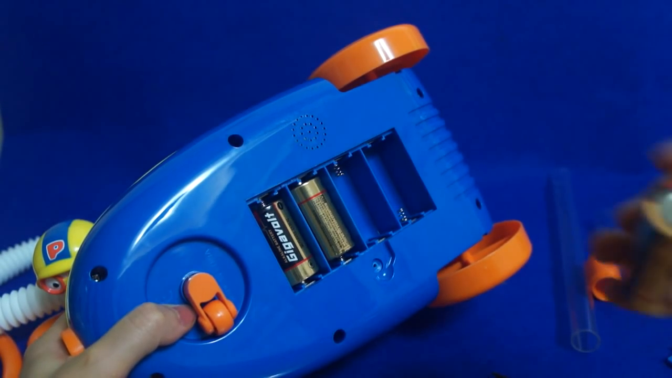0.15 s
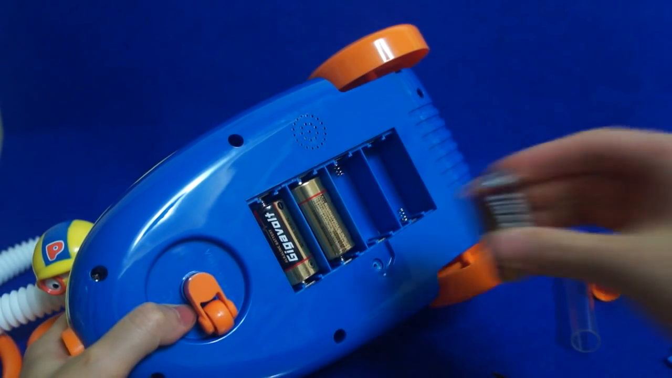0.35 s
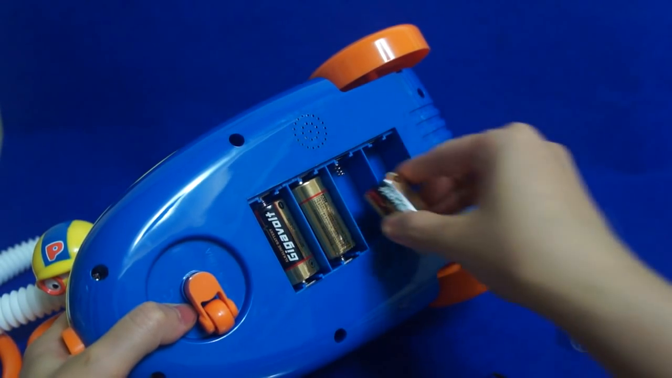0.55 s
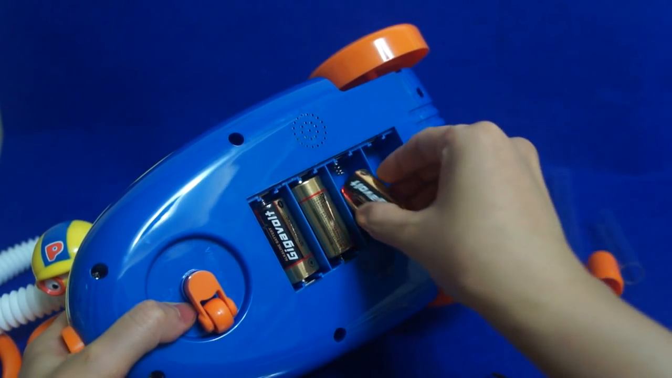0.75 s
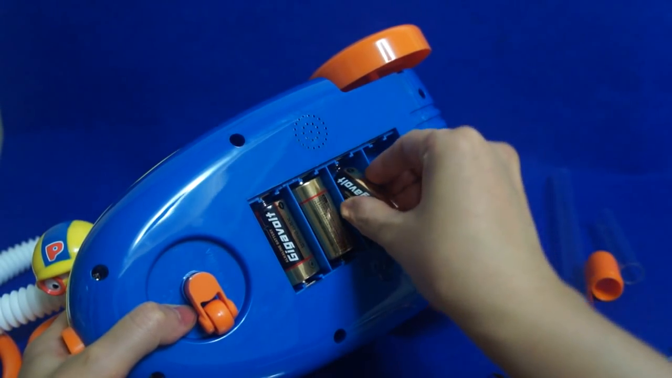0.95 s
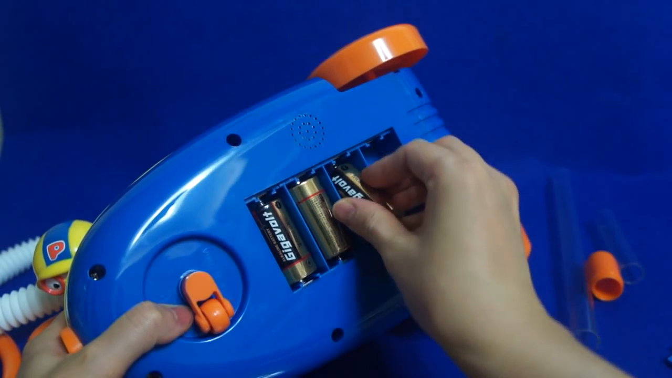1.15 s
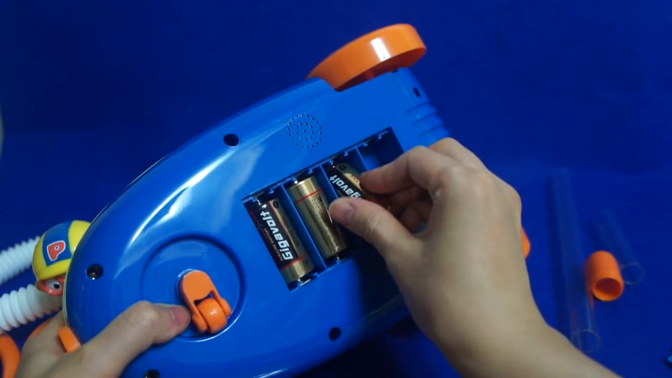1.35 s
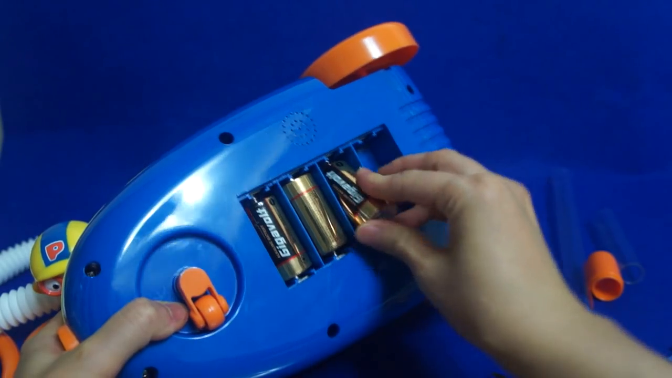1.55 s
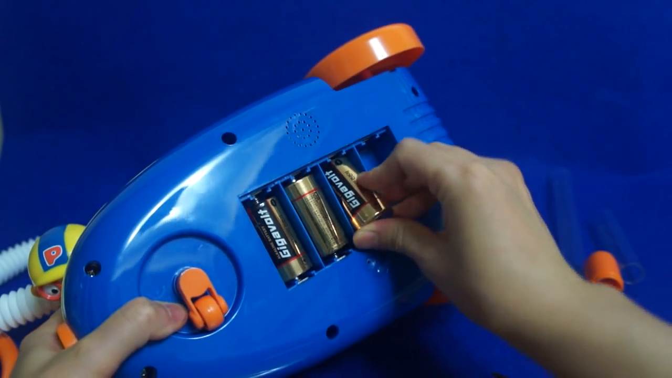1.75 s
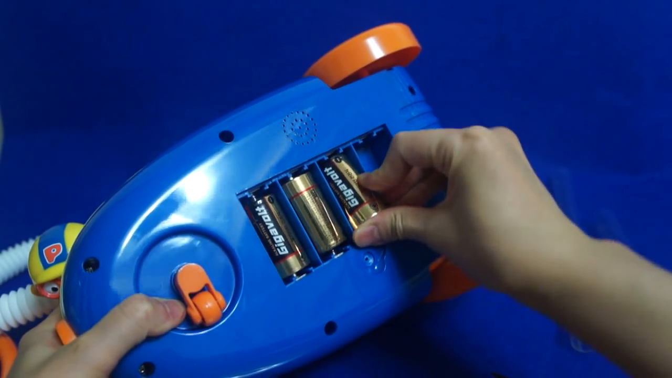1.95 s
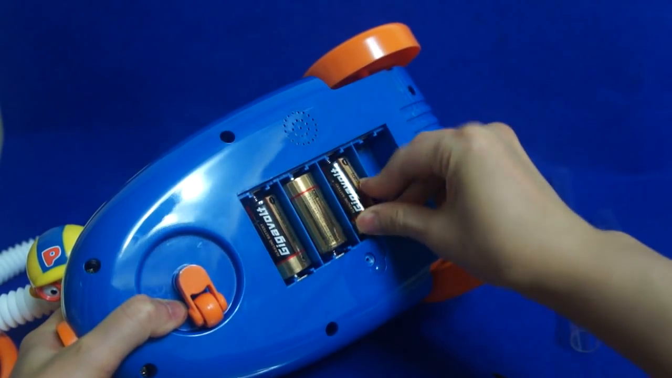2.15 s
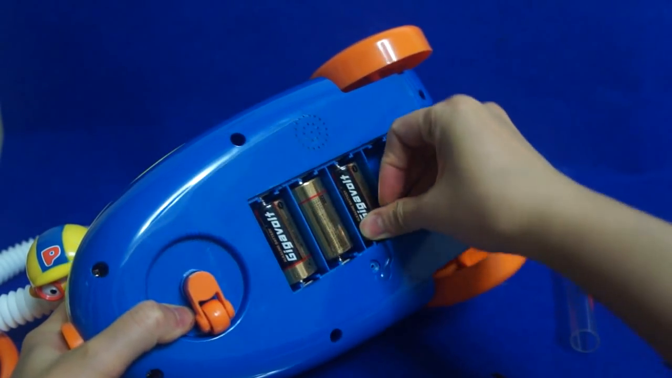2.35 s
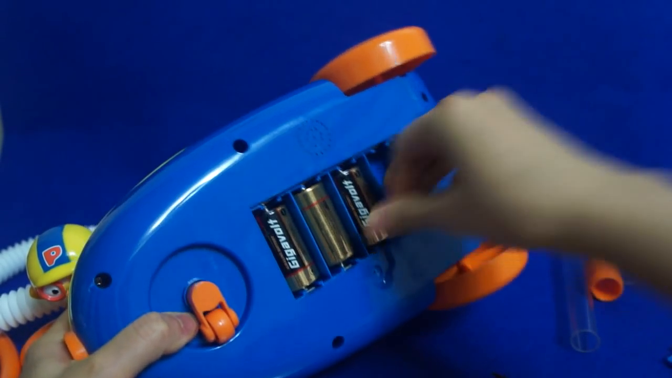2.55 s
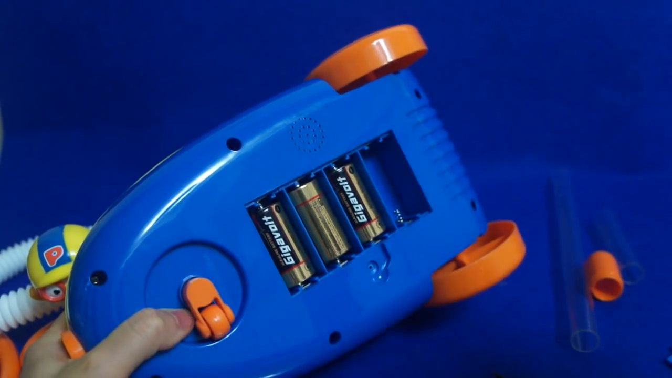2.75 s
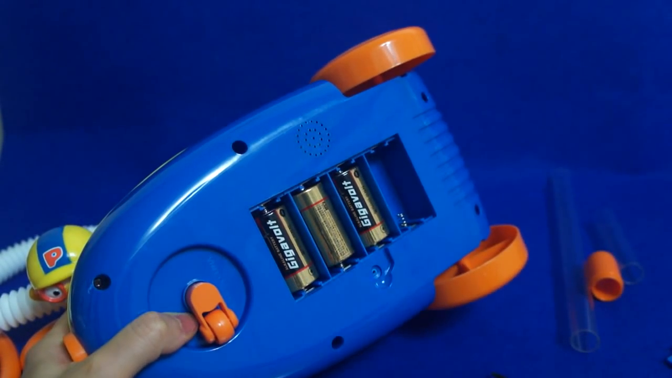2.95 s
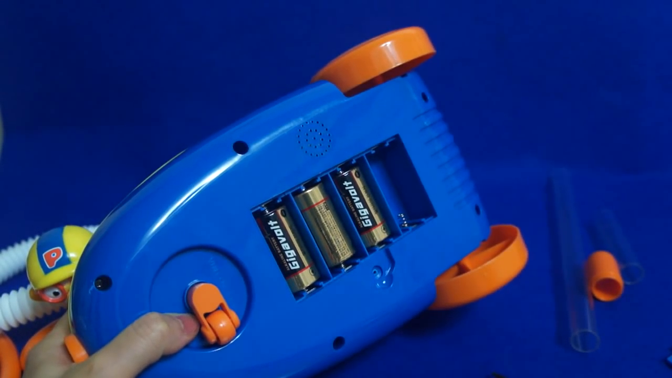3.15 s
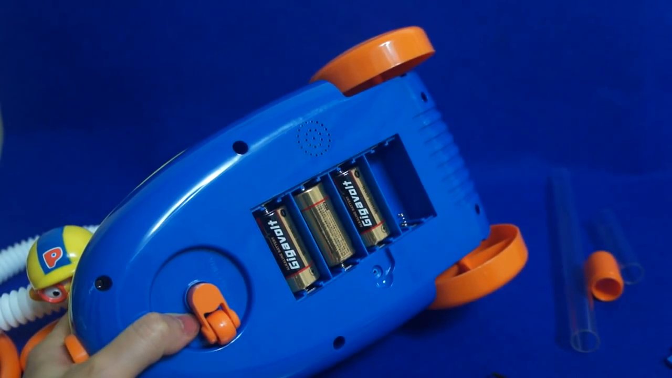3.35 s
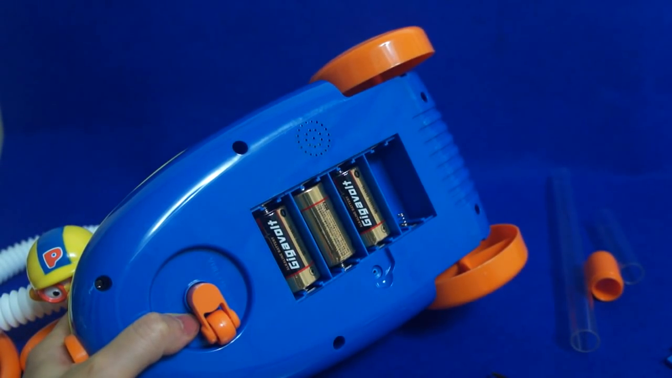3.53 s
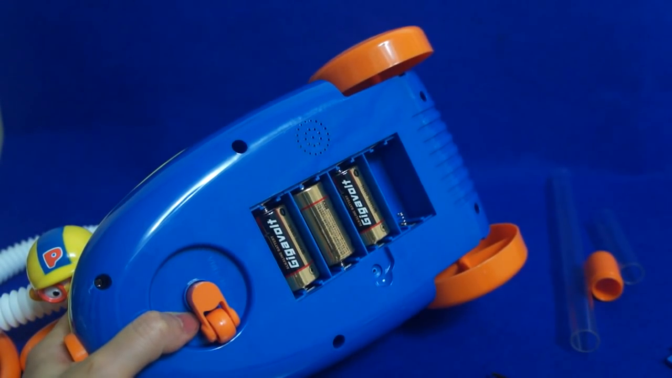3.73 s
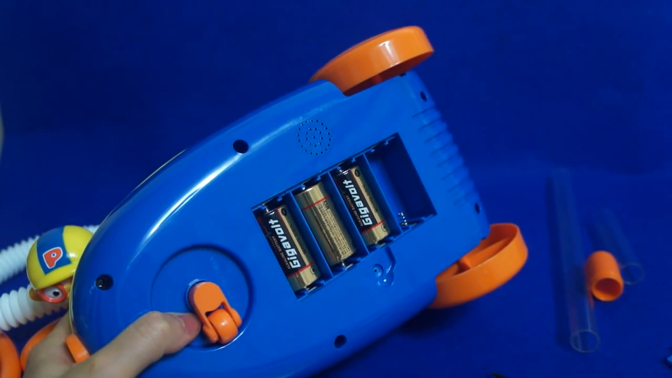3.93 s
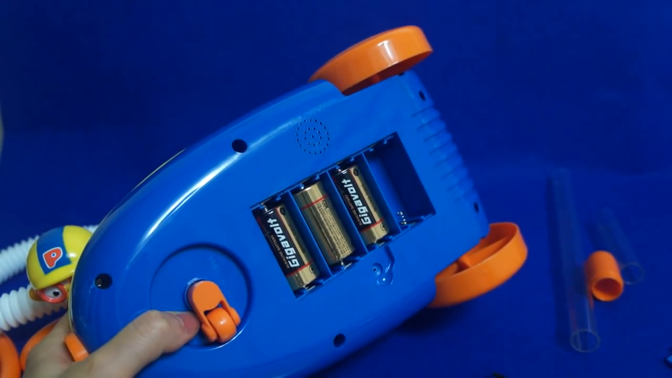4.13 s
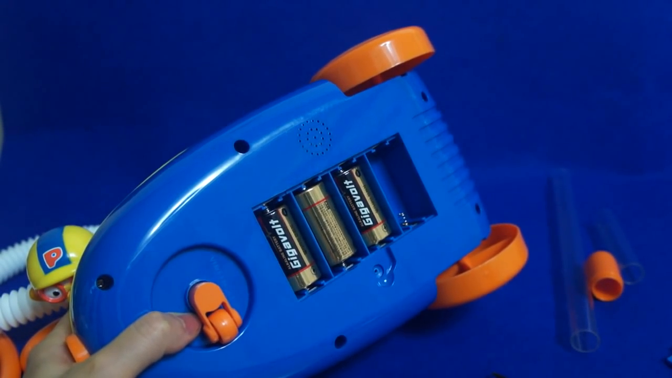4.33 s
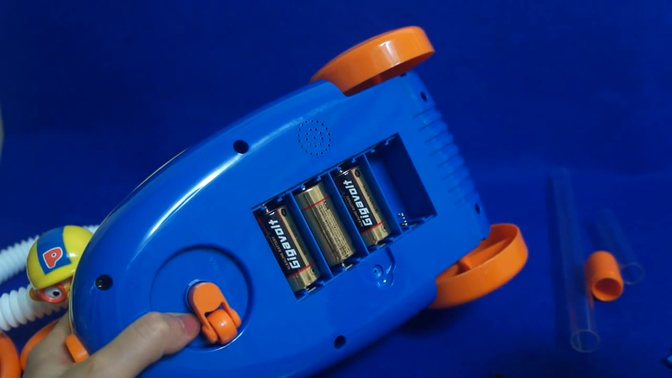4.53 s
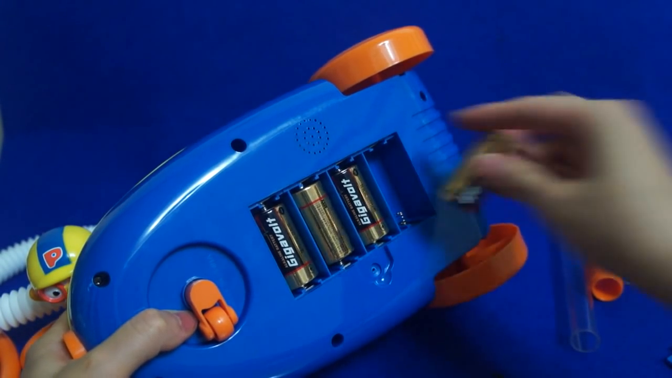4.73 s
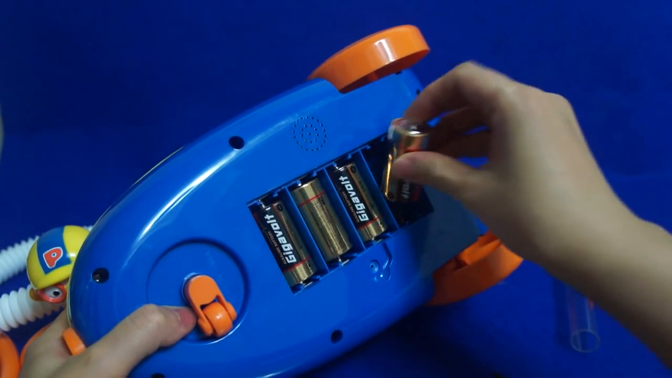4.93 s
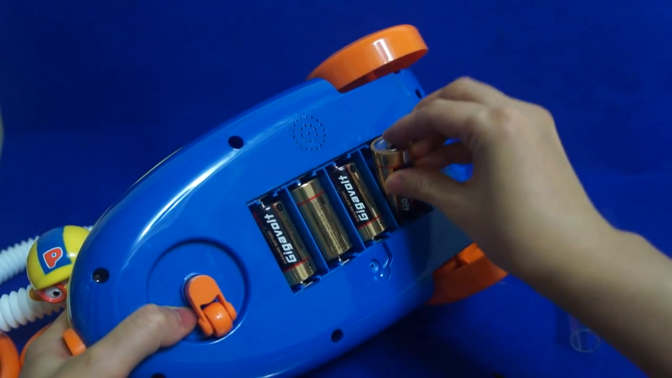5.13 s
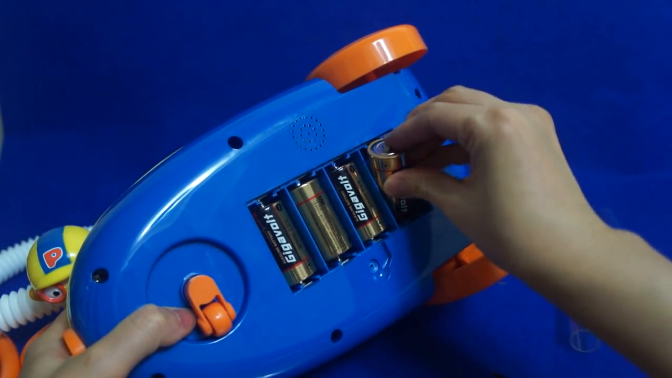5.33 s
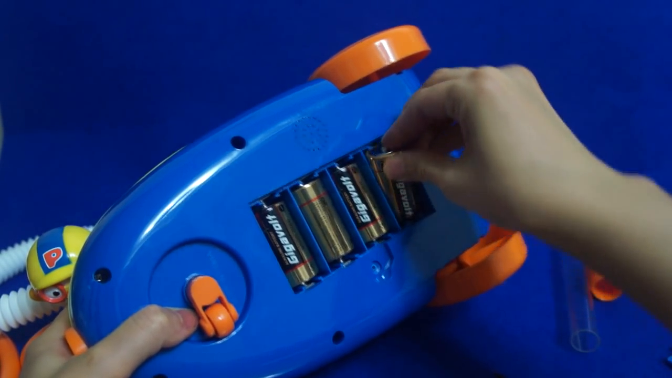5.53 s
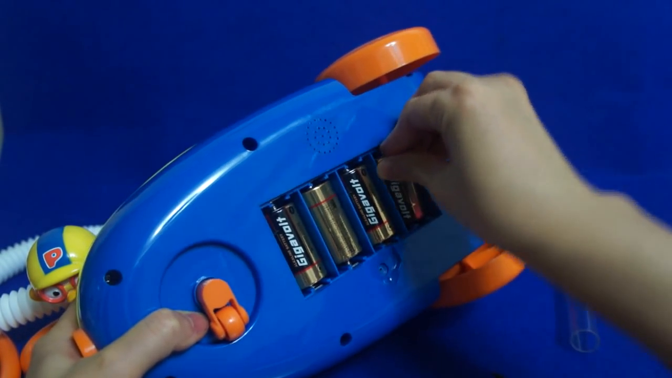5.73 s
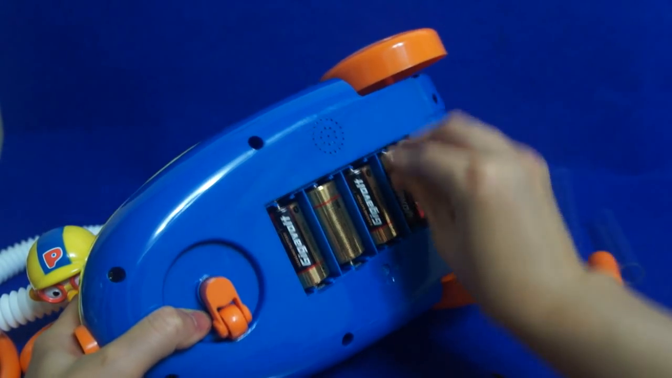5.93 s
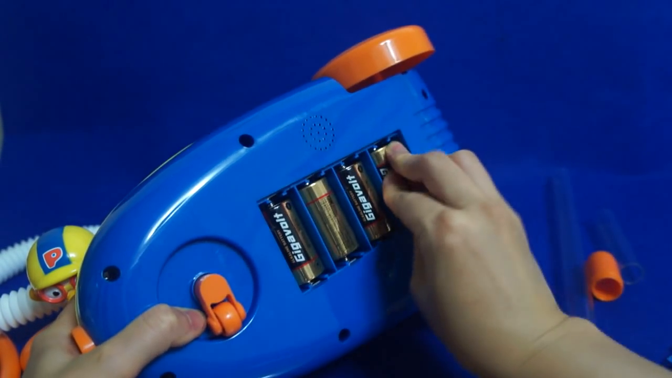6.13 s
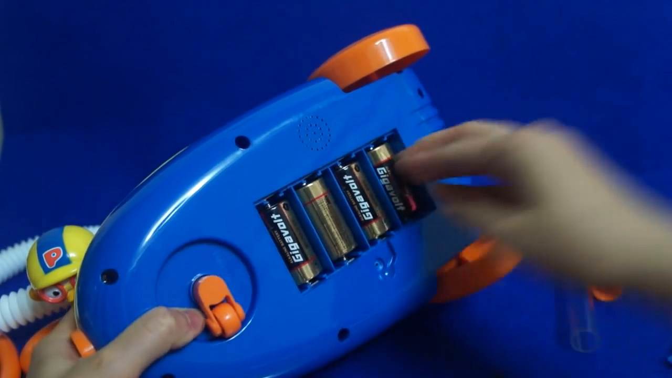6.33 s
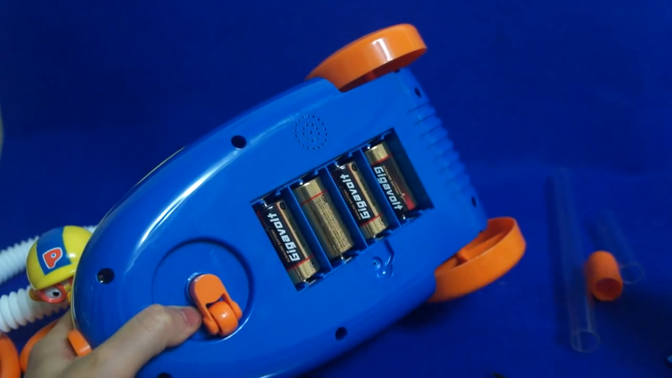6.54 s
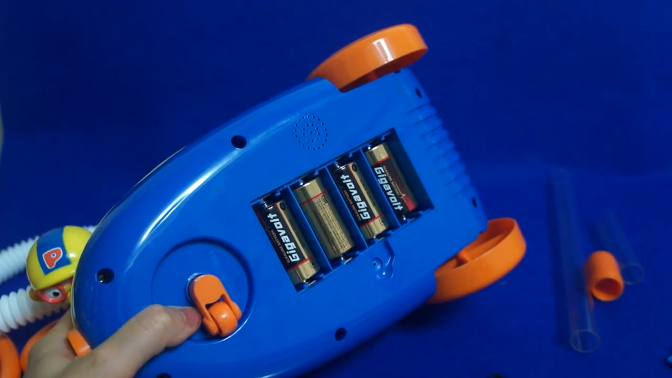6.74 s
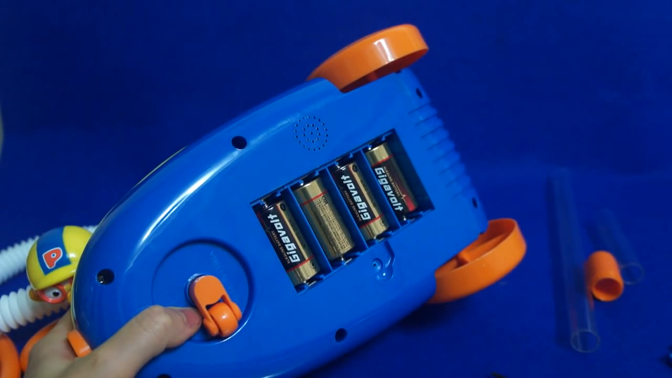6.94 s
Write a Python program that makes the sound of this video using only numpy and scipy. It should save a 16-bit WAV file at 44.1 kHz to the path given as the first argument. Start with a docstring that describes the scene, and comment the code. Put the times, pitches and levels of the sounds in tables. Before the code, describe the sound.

Hard plastic and small metal cells handled close up. The first battery goes in with a knock, a loud clack, faint fumbling and a firm snap. Nearly two seconds of quiet hiss follow. The second battery bumps in more softly, rubs and squeaks briefly on its spring, and clicks into place. Short room reflections, faint low drone.

```python
"""Plastic knocks, clicks and snaps: two batteries pushed into a hollow toy, heard close up in a small quiet room.
Each contact is an impact plus a noise crack, ringing the modes of the toy's shell, with a soft low bump.
Cells scrape on their springs as trains of tiny slips; plastic squeaks; metal rings as clusters of close sines.
Short room reflections follow, over steady hiss and a faint low drone."""
import sys
import numpy as np
from scipy import signal
from scipy.fft import rfft, irfft
from scipy.io import wavfile
from scipy.ndimage import uniform_filter1d

SR = 44100
rng = np.random.default_rng(int(sys.argv[2]) if len(sys.argv) > 2 else 0)


def store_wav(level_fs):
    """Save 16-bit WAV to argv[1]."""
    pcm = np.round(np.clip(np.atleast_2d(level_fs), -1, 1) * 32767)
    wavfile.write(sys.argv[1], SR, pcm.T.astype(np.int16))


N = 312228
HIT_SIZE = 8192  # samples


def amp(db):
    """Amplitude factor of a level in dB."""
    return 10 ** (np.asarray(db) / 20)


def unit_rms(x):
    """Scale to an rms of 1."""
    return x / np.sqrt(np.mean(x ** 2) + 1e-20)


def curve_at(points, hz):
    """Read a curve joined by straight lines on a log-frequency axis."""
    f, value = np.transpose(points)
    return np.interp(np.log(hz + 1), np.log(f + 1), value)


def add(mix, start_s, sound):
    """Sum a sound into the mix, cut at the end."""
    part = mix[:, round(start_s * SR):][:, :sound.shape[-1]]
    part += sound[..., :part.shape[1]]


def noise_pair(size, likeness):
    """Left and right white noise, correlated by likeness: one value or one per frequency bin."""
    a, b = rfft(rng.standard_normal((2, size)))
    c = np.clip(likeness, -1, 1)
    right = c * a + np.sqrt(1 - c ** 2) * b
    return irfft(np.array([a, right]), size)


def coloured(x, points):
    """Minimum-phase filter with the given spectrum: nothing sounds before the attack."""
    size = x.shape[-1]
    hz = abs(np.fft.fftfreq(size, 1 / SR))
    log_gain = np.log(amp(curve_at(points, hz)))
    response = np.exp(signal.hilbert(log_gain).conj())
    return np.fft.ifft(np.fft.fft(x) * response).real


# register voicing, one value each: boom, thud, hollow, clack, snap, tick
# plain contact [level/dB]; shares of hardness, weight, hollowness [dB per dB]
VOICE_DB = [-2, 2, 0.2, 0.55, 2.5, -1.5]
HARDNESS_SHARE = [0.041, 0.012, 0.029, 0, 0.86, 1.11]
WEIGHT_SHARE = [1.05, 0.86, 0.075, 0.031, 0, 0.19]
HOLLOW_SHARE = [0.088, 0.026, 0.51, -0.64, -0.042, -0.29]


def voicing(strength_db, hardness_db, weight_db, hollowness_db):
    """Register levels: hardness lifts mainly treble, weight bass, hollowness the middle at the clack's expense."""
    levels_db = strength_db + np.array(VOICE_DB)
    levels_db += hardness_db * np.array(HARDNESS_SHARE)
    levels_db += weight_db * np.array(WEIGHT_SHARE)
    return levels_db + hollowness_db * np.array(HOLLOW_SHARE)


# knocks, clicks and snaps of the cells in the compartment
# [t/s, strength/dB, hardness/dB, weight/dB, hollowness/dB, crack t60/s]
CONTACTS = [ (0.7487, -30.5, -18.5, -10, 8, 0.023), (0.7812, -52.5, -10, -9, -3, 0.057),
            (0.8908, -52.5, -13, -4.5, 5, 0.11), (1.0502, -56.5, 10.5, -22, -4.5, 0.0089),
            (1.1154, -53.5, -9, -3.5, -9.5, 0.079), (1.268, -36.5, -12, -12, 13, 0.037),
            (1.2744, -17.5, -16, -12.5, 1.5, .025), (1.2765, -32.5, -5.5, -15.5, 11, .016),
            (1.552, -62, -2, -12, -9, 0.0096), (1.577, -60.5, -5, -4, -5, 0.026),
            (1.65, -53, -8, -4.5, -4, 0.15), (1.7601, -46.5, -13, -18, 0, 0.069),
            (1.772, -46, -12, -16, 1, .017), (1.7902, -45.5, 3, 0, 3.5, 0.0087),
            (1.812, -46, -11, -13, 2, 0.073), (1.8348, -44, -5.5, 0.5, 1, 0.045),
            (2.0481, -48, -14.5, -4, 0.5, 0.015), (2.126, -44.5, -6, -6, 1, 0.095),
            (2.138, -40, -7.5, -5.5, -0.5, 0.0049), (2.2125, -51.5, 5.5, 6.5, 7, .015),
            (2.2669, -38.5, 6.5, -11, -8, .014), (2.3227, -29.5, -3.5, -4, 9.5, 0.04),
            (2.3273, -19, -8.5, -1.5, -0.5, .046), (2.3593, -30.5, -31, -5, 2, 0.0098),
            (2.561, -53.5, -9, -9, -5.5, 0.039), (2.6764, -56, 4.5, -3.5, -5, 0.14),
            (2.788, -54, -18, -1.5, 1.5, 0.016), (4.288, -53, -20, -13, 3, 0.078),
            (4.9645, -20, -24, -9, 7.5, 0.063), (4.9777, -32.5, -11.5, -16, -2.5, .05),
            (5.07, -48.5, -1.5, -14, -3, 0.031), (5.0757, -29.5, -37, -11.5, 10, 0.043),
            (5.1946, -53, -10.5, -3, -6, .016), (5.234, -31, -23.5, -8.5, -1.5, 0.016),
            (5.2998, -25, -23.5, -11.5, 3.5, 0.028), (5.3447, -54, -6, -7, -6, .008),
            (5.404, -54, 3, -5, -3, .01), (5.6482, -41.5, -11.5, 2, 5, 0.11),
            (5.709, -44, -12, -5, 3, 0.076), (5.7336, -50.5, -10, 5, -8.5, 0.016),
            (5.8687, -38.5, -19.5, -5, 6.5, 0.06), (5.8944, -48.5, 14.5, -2.5, 6.5, .012),
            (6.0594, -40.5, 0, -10, -1, 0.1), (6.068, -36, -3.5, 0.5, 3, .065),
            (6.1091, -31, -3.5, -3, 9, 0.0056), (6.181, -56, -33, -7, -9, 0.017),
            (6.39, -53.5, -13, -3, -2, 0.07), (6.445, -54.5, -15, 2.5, 2, 0.091),
            (6.499, -56.5, 2, -18, -3, 0.039), (6.971, -65.5, 7.5, -19, -6, 0.16)]
# bays; the last lies near the stiff rim: booms less, rings higher
# [in use from t/s, boom level/dB, factor on shell f]
BAYS = [(0, -0.5, 0.998), (4.5, -8, 1.014)]
# a firm grip chokes the crack and damps the shell: shell t60 factor grows with crack t60
GRIPPED_SUSTAIN, SUSTAIN_PER_S = 0.39, 11


def contacts():
    """First cell tips in, works against the spring, snaps home; the second follows in the last bay."""
    out = np.zeros((2, N))
    first_bay, last_bay = BAYS
    for start_s, strength_db, hardness_db, weight_db, hollowness_db, crack_t60_s in CONTACTS:
        _, boom_db, pitch = last_bay if start_s >= last_bay[0] else first_bay
        levels_db = voicing(strength_db, hardness_db, weight_db, hollowness_db)
        levels_db[0] += boom_db
        sustain = GRIPPED_SUSTAIN + SUSTAIN_PER_S * crack_t60_s
        hollow_db = levels_db[2]
        add(out, start_s, contact(levels_db, crack_t60_s, sustain, pitch) + push(hollow_db))
    return out


# register limits [f/Hz]
REGISTER_EDGES_HZ = [130, 280, 420, 750, 1800, 5000, 11000]
# broad resonances of springs and thin ribs colouring the crack [f/Hz, level/dB]
CRACK = [(2000, 0.5), (2900, -3), (3700, 0), (4800, 4), (5500, 5.5), (6200, 4.5), (7000, 11.5), (8100, 8.5),
         (8900, 0), (9800, 11), (11000, -39)]


def contact(levels_db, crack_t60_s, sustain, pitch, crack_db=5.0, impact_db=10.5, rattle_db=-16.0,
            rattle_t60_s=0.11, likeness=0.34, ripple_db=3.0, bass_db=-7.5, sub_db=-10.0):
    """Impact, crack of dense high modes, rattle of loose parts and ringing shell, set to register levels."""
    t = np.arange(HIT_SIZE) / SR
    hz = np.fft.rfftfreq(HIT_SIZE, 1 / SR)
    decay = amp(-60 * t / max(crack_t60_s, .003)) + amp(rattle_db - 60 * t / rattle_t60_s)
    crack = decay * noise_pair(HIT_SIZE, curve_at([(400, 0.84), (1100, 0.96), (2200, likeness)], hz))
    crack[:, 0] += amp(impact_db)

    # each contact wakes its own high resonances; the bass is left to the shell
    ripple_hz = np.linspace(1500, 11000, 32)
    scatter_db = ripple_db * rng.standard_normal(len(ripple_hz)) * (ripple_hz > 1600)
    ripple = curve_at(CRACK, ripple_hz) + scatter_db
    crack = coloured(crack, np.r_[[(220, bass_db), (450, 2), (1200, 4)], np.c_[ripple_hz, ripple]])
    sound = shell(t, sustain, pitch) + amp(crack_db) * crack
    sound = coloured(sound, [(40, sub_db), (120, sub_db), (190, 0.016)])

    edges_hz = np.array(REGISTER_EDGES_HZ)
    centres_hz = np.sqrt(edges_hz[1:] * edges_hz[:-1])
    attack_size = SR // 50
    for _ in range(2):  # steer each register's rms over the first 20 ms to its level
        spectrum = rfft(sound[:, :attack_size], HIT_SIZE)
        power = (abs(spectrum) ** 2).mean(0) * 2 / (HIT_SIZE * attack_size)
        register_power = np.add.reduceat(power, edges_hz * HIT_SIZE // SR)[:-1]
        held_db = 10 * np.log10(register_power + 1e-20)
        sound = coloured(sound, np.c_[centres_hz, np.asarray(levels_db) - held_db])
    return sound


# plastic shell modes, before scatter, detune and the contact's factors [f/Hz, level/dB, t60/s]
SHELL = [(211, -5, 0.15), (285, -8.5, 0.098), (322, -10, 0.046), (376, -21, 0.013), (486.5, -8.5, 0.13),
         (548.4, 2, 0.1), (590.4, -1.5, 0.058), (680, -21.5, 0.036), (890, -19, 0.16), (960, -11, 0.027),
         (1064, -5.5, 0.028), (1161, -4.5, 0.039), (1328, -9.5, 0.018), (1346, -15.5, 0.095),
         (1565, -17.5, 0.019), (1535, -26.5, 0.16), (2005, -12, 0.013), (1930, -31, 0.016),
         (2272, -20, 0.078)]


def shell(t, sustain=1, pitch=1, scatter_db=5.0, detune=0.017, apart_hz=4000):
    """Decaying sine modes, randomly favoured per call; higher ones differ more in phase between the ears."""
    hz, db, t60_s = np.transpose(SHELL)[:, :, None]
    strength, stretch, side = rng.standard_normal((3, len(SHELL), 1))
    ring = amp(db + scatter_db * strength - 60 * t / (t60_s * sustain))
    sign = (-1) ** np.arange(len(SHELL))[:, None]  # neighbouring modes push the air in opposite ways
    phase = 2 * np.pi * hz * pitch * (1 + detune * stretch) * t
    apart = (1 + side) / 2 * hz / apart_hz
    return np.array([(sign * ring * np.sin(phase + ear * apart)).sum(0) for ear in (-1, 1)])


def push(force_db, push_db=-24.5, hz=80, t60_s=0.089):
    """The whole toy gives a little on the cloth: one soft, low decaying sine."""
    t = np.arange(HIT_SIZE) / SR
    return amp(force_db + push_db - 60 * t / t60_s) * np.sin(2 * np.pi * hz * t)


# springs and battery cans singing [t/s, f/Hz, level/dB, t60/s]
RINGS = [(1.277, 6010, -28, 0.028), (1.281, 6850, -41, 0.099), (2.327, 9800, -14, 0.0042),
         (2.6768, 6730, -39, 0.069), (2.6771, 1840, -45.5, 0.13), (4.966, 1980, -24, 0.053),
         (4.967, 6740, -39, 0.11), (5.0714, 2010, -18, 0.013), (5.358, 5750, -35, 0.033),
         (5.392, 5750, -41.5, 0.063), (6.974, 2230, -55, 0.58), (6.975, 1590, -51.5, 0.14)]


def rings(spread=0.068, count=7):
    """Each metal part rings as a cluster of close, beating sines."""
    out, t = np.zeros((2, N)), np.arange(HIT_SIZE) / SR
    for start_s, hz, db, t60_s in RINGS:
        cluster_hz = hz * (1 + spread * np.linspace(-1, 1, count) ** 3)[:, None]
        phase = 2 * np.pi * rng.random((2, count, 1))
        tone = unit_rms(np.sin(2 * np.pi * cluster_hz * t + phase).sum(1))
        add(out, start_s, amp(db - 60 * t / t60_s) * tone)
    return out


# short squeaks of plastic [middle t/s, f/Hz, level/dB, length/s]
SQUEAKS = [(0.7406, 1860, -29, 0.0058), (0.783, 2020, -37, 0.012), (5.357, 1222, -35, .035),
           (5.405, 1253, -44.5, .055), (5.478, 1880, -34.5, .003), (6.494, 2280, -45.5, 0.049)]


def squeaks(wobble=0.1):
    """Stick-slip: a brief sine of unsteady pitch."""
    out = np.zeros((2, N))
    for middle_s, hz, db, length_s in SQUEAKS:
        size = round(length_s * SR)
        drift = unit_rms(uniform_filter1d(rng.standard_normal(size), size=40))
        pitch_hz = hz * (1 + wobble * drift)
        tone = np.sin(2 * np.pi * np.cumsum(pitch_hz) / SR)
        add(out, middle_s - length_s / 2, amp(db) * np.hanning(size) * tone)
    return out


# a cell slides on spring and wall, levels before the stroke's envelope
# [start t/s, length/s, scratch level/dB, shell rumble level/dB]
SLIDES = [(0.976, 0.081, -57, -49), (1.227, 0.021, -60, -47.5), (1.608, 0.088, -50, -50),
          (2.146, 0.074, -52, -51), (5.328, 0.053, -47, -47), (5.371, 0.054, -43, -46.5),
          (5.83, 0.051, -61, -52.5), (6.225, 0.17, -79, -58)]
# scratch colour [f/Hz, relative level/dB]
SCRATCH = [(200, -20), (1200, 3), (2500, 2), (4200, 2.5), (6500, -2), (10000, -7)]
SLIP_SPREAD_DB = 4
STROKE_CREST = 0.64  # share of the stroke
STROKE_START_DB, STROKE_END_DB = -5.5, -5.5  # re crest


def slides(slips_per_s=400):
    """Tiny uneven slips scratch directly and shake the shell; pressure builds, then eases."""
    out, t = np.zeros((2, N)), np.arange(HIT_SIZE) / SR
    for start_s, length_s, scratch_db, rumble_db in SLIDES:
        size = round(length_s * SR)
        slip_db = SLIP_SPREAD_DB * np.minimum(rng.exponential(1, size), 3)
        slips = (rng.random(size) < slips_per_s / SR) * amp(slip_db)
        grain = noise_pair(HIT_SIZE, 0.2) * amp(-60 * t / 0.014)
        scratch = signal.fftconvolve(slips[None], grain, axes=1)
        scratch = unit_rms(coloured(scratch, SCRATCH)[:, :size])
        rumble = signal.fftconvolve(slips[None], shell(t), axes=1)
        rumble = unit_rms(coloured(rumble, [(100, -32), (550, -1), (1200, 0.5)])[:, :size])
        stroke_db = [STROKE_START_DB, 0, STROKE_END_DB]
        pressure = amp(np.interp(np.arange(size) / size, [0, STROKE_CREST, 1], stroke_db))
        slide = amp(scratch_db) * scratch + amp(rumble_db) * rumble
        add(out, start_s, slide * pressure * signal.windows.tukey(size, .15))
    return out


# reverberation time [f/Hz, t60/s]
ROOM_T60 = [(150, 0.54), (500, 0.31), (1200, 0.38), (3000, 0.3), (9000, 0.38)]
# reverberation send [f/Hz, level/dB]
ROOM_SEND = [(150, -8), (350, -6.5), (550, -9), (800, -5.5), (1200, -3.5), (1900, -6), (3000, -7),
             (9000, -13)]


def room(x, first_s=0.0014, build_s=0.00094):
    """Reflections thicken within milliseconds, then each band dies at its own speed; bass nearly mono."""
    size = SR * 3 // 4
    likeness_points = [(200, 1.0), (600, 0.94), (1300, 0.19), (2200, 0.36), (4000, 0.071)]
    likeness = curve_at(likeness_points, np.fft.rfftfreq(size, 1 / SR))
    hz, t, bands = signal.stft(noise_pair(size, likeness), SR, nperseg=256)
    t60_s = curve_at(ROOM_T60, hz)[:, None]
    unit_energy = np.sqrt(2 * np.log(1000) / (t60_s * SR))
    bands = bands * amp(curve_at(ROOM_SEND, hz)[:, None] - 60 * t / t60_s) * unit_energy
    tail = signal.istft(bands, SR, nperseg=256)[1][:, :size]
    tail *= np.clip((np.arange(size) / SR - first_s) / build_s, 0, 1)
    return signal.fftconvolve(x, tail, axes=1)[:, :N]


# room and microphone noise colour [f/Hz, relative level/dB]
HUSH = [(20, -37), (45, -21), (100, -6.5), (150, -2.5), (300, 2), (600, -2), (1200, -4), (2500, -9),
        (5000, -13.5), (10000, -19)]
# its left-right correlation [f/Hz, -1 to 1]
HUSH_LIKENESS = [(60, -0.027), (170, -0.38), (490, -0.2), (1380, -0.42), (3930, -0.25), (11200, 0.11)]
HUSH_DB, HISS_EDGE_HZ = -52.5, 10400
HUM_HZ, HUM_DB = 78.46, -77


def hush(hum_width_hz=0.52):
    """Steady coloured noise, plus a narrow noise band heard as a wavering low drone."""
    hz = np.fft.rfftfreq(N, 1 / SR)
    noise = rfft(noise_pair(N, curve_at(HUSH_LIKENESS, hz)))
    hiss = noise * amp(curve_at(HUSH, hz)) * (hz < HISS_EDGE_HZ)
    hum = rfft(rng.standard_normal(N)) / (1 + ((hz - HUM_HZ) / hum_width_hz) ** 2)
    return amp(HUSH_DB) * unit_rms(irfft(hiss, N)) + amp(HUM_DB) * unit_rms(irfft(hum, N))


# stereo balance of the toy [f/Hz, left minus right level/dB]
BALANCE_LR = [(140, -0.8), (340, -0.5), (550, -3), (1100, 1.5), (2000, -0.4), (4500, -0.5), (9000, 3)]


def scene():
    """The toy, balanced left to right by frequency, its room and the hush."""
    left, right = contacts() + rings() + squeaks() + slides()
    hz, lean_db = np.transpose(BALANCE_LR)
    left = coloured(left, np.c_[hz, lean_db / 2])
    right = coloured(right, np.c_[hz, -lean_db / 2])
    toy = np.array([left, right])
    return toy + room(toy) + hush()


EDGE_HZ = 10650


def record(dry):
    """Band limit: linear-phase low-pass."""
    low_pass = signal.firwin(401, EDGE_HZ, window=("kaiser", 8), fs=SR)
    return signal.oaconvolve(dry, low_pass[None], "same")


dry = scene()
out = record(dry)
store_wav(out)
```